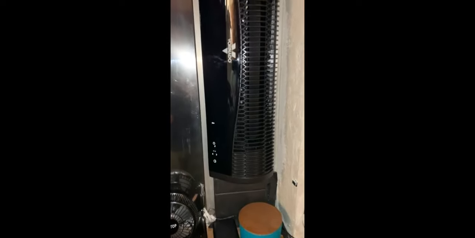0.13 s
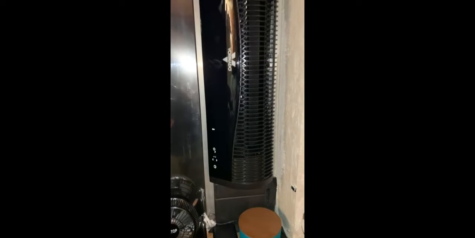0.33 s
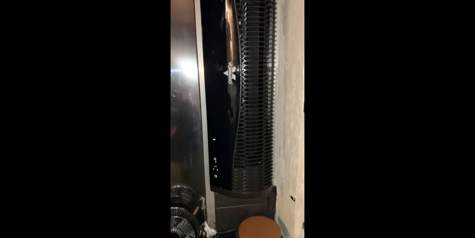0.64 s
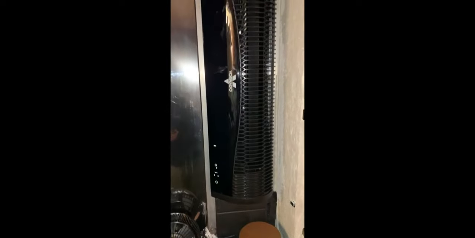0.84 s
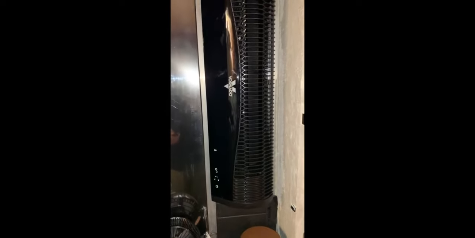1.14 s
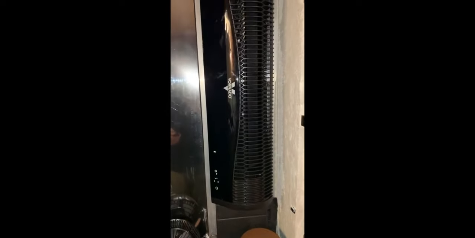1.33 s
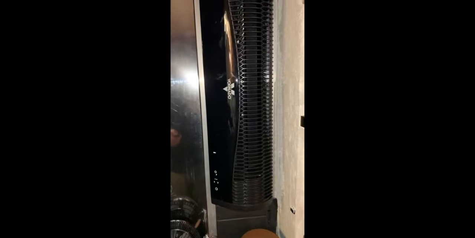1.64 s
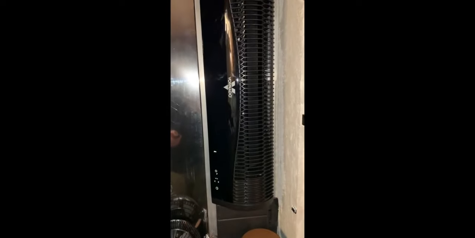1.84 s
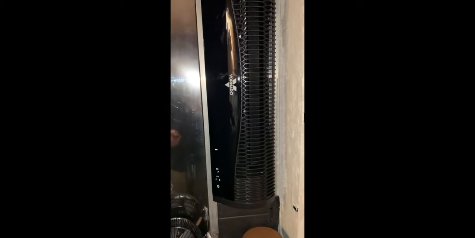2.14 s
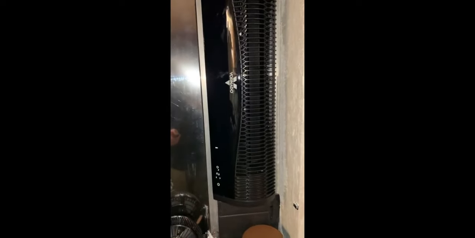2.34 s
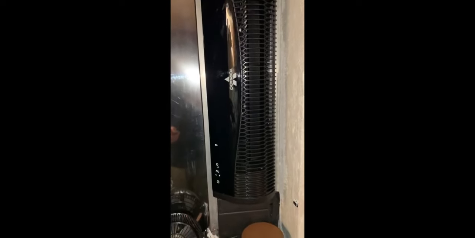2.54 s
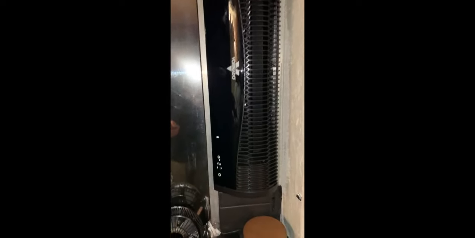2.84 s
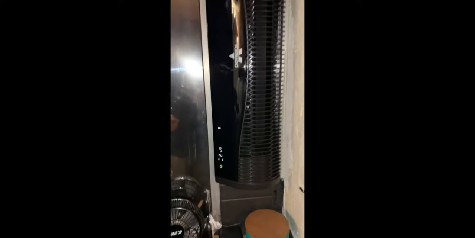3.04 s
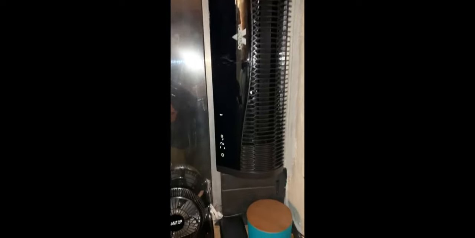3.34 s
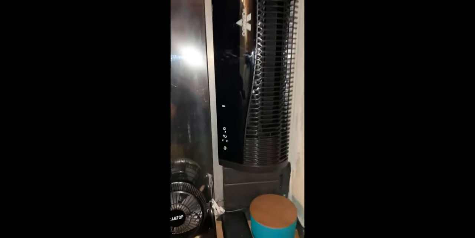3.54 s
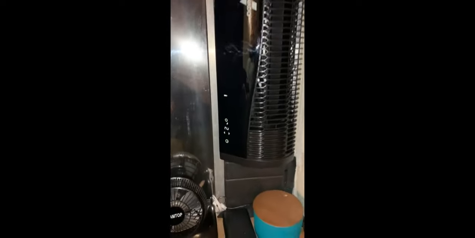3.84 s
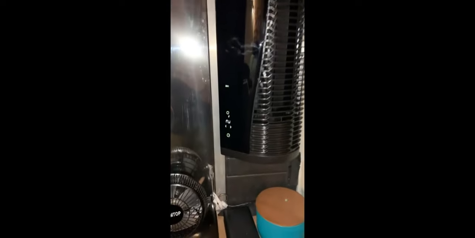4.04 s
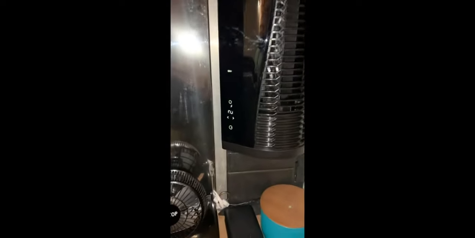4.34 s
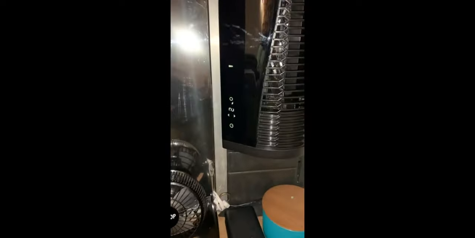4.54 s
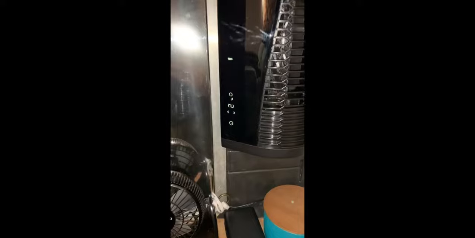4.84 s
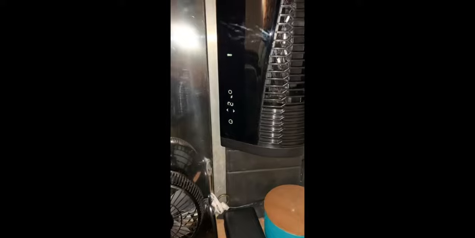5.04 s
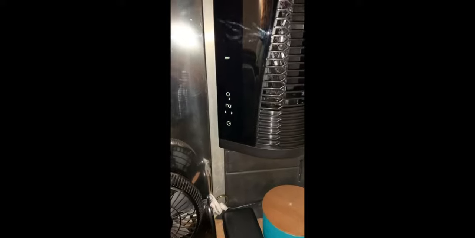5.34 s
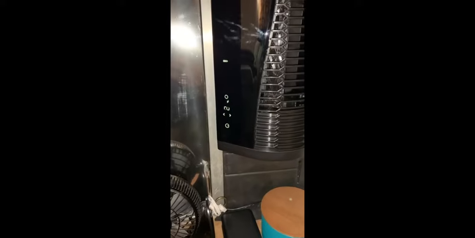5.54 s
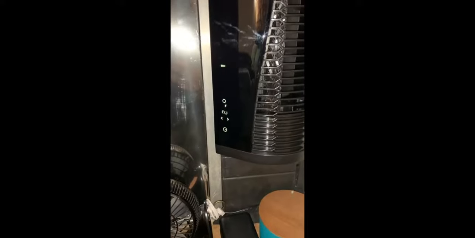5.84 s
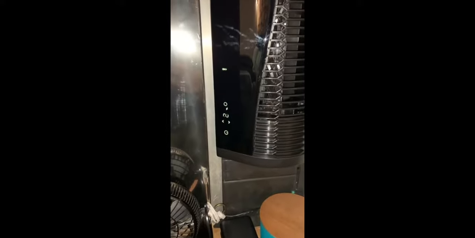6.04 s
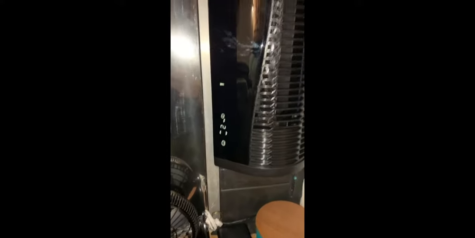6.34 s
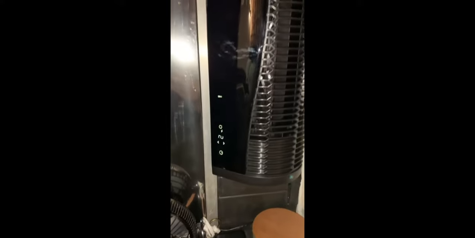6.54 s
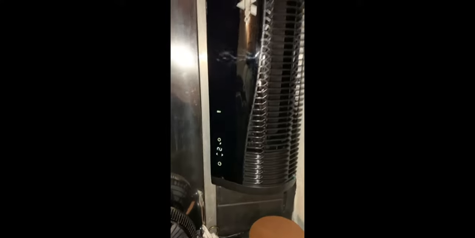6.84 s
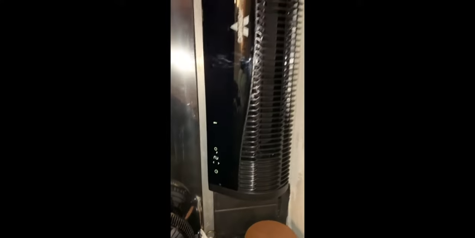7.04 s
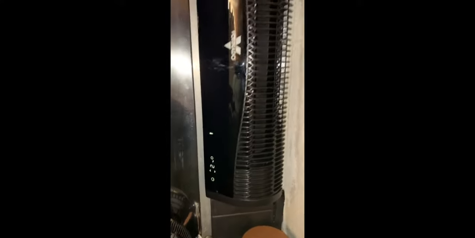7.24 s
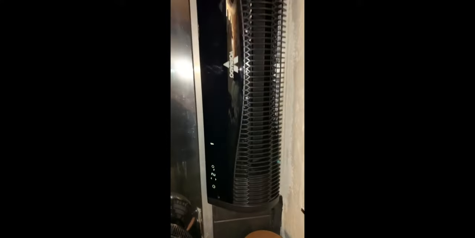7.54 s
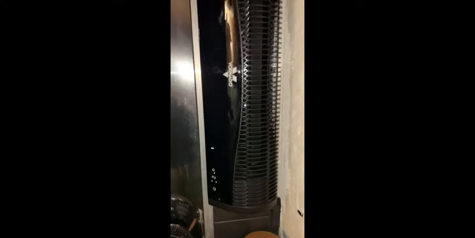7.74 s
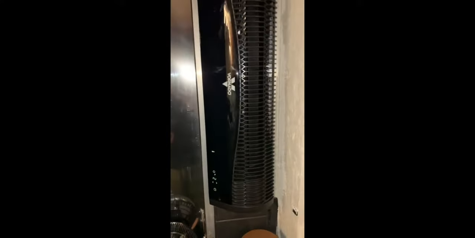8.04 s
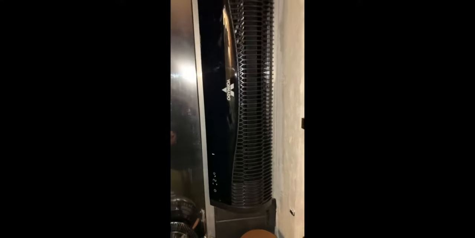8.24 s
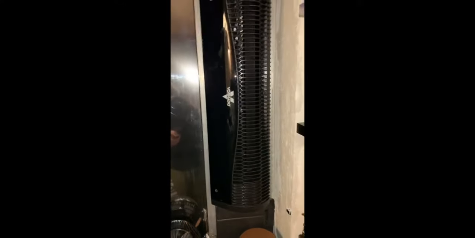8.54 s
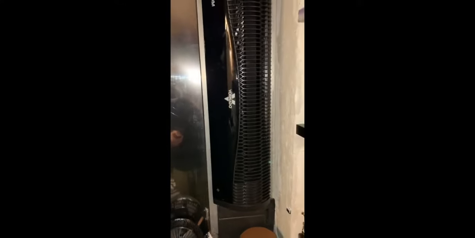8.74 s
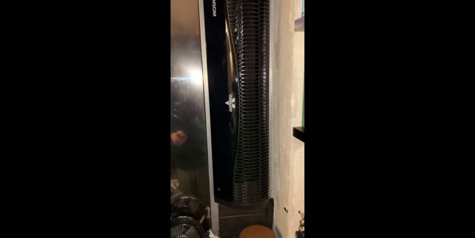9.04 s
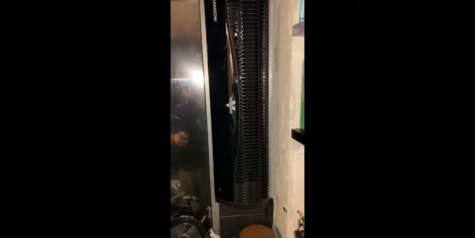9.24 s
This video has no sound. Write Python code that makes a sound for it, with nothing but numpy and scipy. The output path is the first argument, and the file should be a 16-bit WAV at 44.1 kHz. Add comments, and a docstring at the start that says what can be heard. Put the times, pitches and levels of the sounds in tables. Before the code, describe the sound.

In a small indoor room, a tower fan blows an even rush of air over a low rotor hum. Dull finger thumps come early, then the fan steps up and its hum rises slightly. The handheld microphone drifts into the stream, making it fuller and more whistling, then back out amid more thumps and a short low rumble.

```python
"""Tower fan and a hand-held phone

A tower fan runs in a small room and steps up to a faster setting; the phone moves into its air stream and out again.
Shaped noise forms the rush of air and a faint background hiss, and narrow resonances the whistle of the grille.
Sine tones form the hum of rotor and motor; three times the noise of air and rotor dips briefly.
Fingers and palm shift on the phone: decaying oscillations thump and low noise rumbles in its microphones."""
import sys
import numpy as np
from scipy import signal
from scipy.fft import rfft, irfft, next_fast_len
from scipy.io import wavfile
from scipy.ndimage import uniform_filter1d

SR = 44100
rng = np.random.default_rng(int(sys.argv[2]) if len(sys.argv) > 2 else 0)


def master(y):
    """Save y as 16-bit WAV."""
    cut = np.clip(np.atleast_2d(y).T, -1, 1)
    pcm = np.round(cut * 32767)  # scale
    wavfile.write(sys.argv[1], SR, pcm.astype(np.int16))


N = 414981

# Relative spectra of the air noise. Each row: frequency in Hz, density in dB per Hz.
DRAUGHT_COLOUR = [(15, -37.5), (30, -10.5), (48, 3), (80, 1.5), (140, -2.5), (210, -5.5), (300, -14.5),
                  (450, -10.5), (800, -21.5), (2000, -89)]
RUSH_COLOUR = [(100, -16.5), (300, -12), (450, -3), (600, -2.5), (760, -2), (920, -5.5), (1120, -7),
               (1270, -5.5), (1700, -8), (2050, -16.5), (2600, -15), (3100, -23.5), (3900, -24),
               (4700, -48), (9000, -72)]
HISS_COLOUR = [(1000, -15.5), (2200, -4), (2750, 7), (3300, 0), (4200, 1.5), (5100, -1), (5900, -5),
               (6600, -5.5), (7300, -5.5), (8600, -10.5), (9600, -43), (12500, -18.5), (14500, -31)]
# Relative spectrum of the faint background hiss. Each row: frequency in Hz, density in dB per Hz.
FLOOR_COLOUR = [(100, -3.5), (9500, -19.5), (11200, 14.5), (12600, 13), (14000, 11.5), (15000, -19.5)]
FLOOR_DB = -87.5
# Level laws. Each holds: dB at the slow setting, dB gained by the step in speed,
# dB gained in the stream, share of the dips as a factor.
DRAUGHT_LAW = (-49, 1.5, 2.5, 1.2)
RUSH_LAW = (-54, 2.5, 1.5, .5)
HISS_LAW = (-77, 5.5, 2, 1.5)
WHISTLE_LAW = (-60, 0.5, 6, 1.5)
# Depth of the slow random flutter, rms dB.
RUSH_FLUTTER_DB, HISS_FLUTTER_DB, WHISTLE_FLUTTER_DB = 0.4, 0.7, 1.1
# Standing waves in the tall housing. Each row: frequency in Hz, width in Hz, lift in dB.
HOUSING_MODES = [(615, 38, 5), (686, 24, 5.5), (811, 34, 3.5), (912, 44, 5), (1043, 32, 6), (1133, 19, 5.5),
                 (3630, 150, 1.5), (4540, 91, 3.5), (5270, 140, 5.5), (6380, 120, 5), (6710, 160, 4.5)]
# Resonances of the duct and grille. Each row: frequency in Hz, width in Hz, relative density in dB,
# beaming as a factor on the whistle's swing in level.
GRILLE_MODES = [(286, 99, -5, 3.8), (1449, 59, 5.5, 0.92), (1490, 50, -0.5, .2), (1565, 47, 3, 1.36),
                (1643, 40, -5, 1.3), (1806, 59, -10.5, 1.1), (2440, 31, -18, .1), (2630, 44, -9, 1.7),
                (2747, 32, -13.5, 1.8), (2815, 40, -17, 1.5), (2983, 61, -19, 3), (3280, 460, -21.5, 2.04)]
# Momentary swells of the whistles near one pitch. Each row: crest in seconds, half-length in seconds,
# pitch in Hz, lift in dB.
SWELLS = [(3.25, 0.2, 2700, 7.5), (3.61, 0.15, 2650, 8.5), (3.853, 0.48, 1510, 1), (5.63, 0.14, 2700, 4.5),
          (6.242, 0.17, 2650, 5), (7.16, 0.22, 1500, 4.5), (8.404, 0.56, 2680, 6)]
SWELL_REACH_HZ = 220
# Pitch drift of the air's resonances as stream and phone move. It holds: rms share of the pitch, drifts per second.
DRIFT = (.003, 1.5)
# Ripple on the air noise, fine all over and coarser in the treble. Each row: rms depth in dB before evening,
# patch width in Hz, patch length in seconds, frequency of full depth in Hz, width of even power in Hz.
RIPPLE = [(2.1, 15, .065, 600, 200), (1.7, 55, .035, 2600, 2500)]
# Left and right in the noise. Each row: frequency in Hz, likeness from 0 to 1.
LIKENESS = [(60, 1), (130, 1), (220, 0.8), (350, .95), (750, 0.6), (1030, .5), (1450, 1), (2100, 0),
            (2800, 0.73), (3600, 0.55), (5000, 0.9), (13000, .75)]
# Each row: frequency in Hz, phase by which left leads in radians.
NOISE_LEAD = [(35, -.14), (130, -.36), (280, -.3), (550, 0.55), (820, 0.7), (1050, -0.6), (1480, -0.85),
              (1950, -1.5), (2350, -3.5), (3900, -4.5), (4900, -3.5), (7000, 1.5), (9700, -1.5), (11000, 0),
              (14500, 0)]
# Each row: frequency in Hz, left minus right in dB.
BALANCE = [(40, -.2), (120, -2.5), (400, -2.8), (700, -2), (1300, 0), (2300, -2), (6000, 0.5)]
# Position in the air stream. Each row: time in seconds, nearness from 0 to 1.
NEARNESS = [(0, 0.2), (2.3, 0.02), (3.6, 0.28), (4.6, 0.9), (6.5, 0.97), (7.2, 0.7), (8.2, 0.27),
            (9.41, 0.05)]
# Brief dips in the noise of air and rotor. Each row: start in seconds, hold in seconds, release in seconds,
# depth in dB before each layer's share.
DIPS = [(0.52, 0.31, 0.38, 3), (1.856, 0.85, 0.13, 3.5), (7.647, 0.092, 0.53, 3)]
DIP_FALL_S = 0.016
# Rotor partials. Each row: multiple of the rotor tone, rms dB at the slow setting before each side's offset,
# dB gained by the step in speed, dB gained in the stream.
ROTOR_PARTIALS = [(1, -48.5, -1, 6), (2, -49, 2.5, 4), (4, -73.5, 3, 6.5)]
ROTOR_DIP_SHARE = 1.15
# The rotor tone is steady at first, then settles on a higher pitch and keeps creeping up.
SLOW_HZ, STEP_HZ, CREEP_HZ_PER_S = 83.9, 8.15, 0.44
SPEED_UP_S, SPIN_UP_S = 2.65, 0.58
# Mains hum of the motor. Each row: frequency in Hz, rms level in dB, dB gained in the stream.
MAINS_HUM = [(119.3, -55.5, 0), (479.1, -74.5, 8)]
# Finger knocks ahead of the case. Each row: crest in seconds, peak in dB, pitch at the crest in Hz,
# rise in cycles, fall in cycles, relative skin drag in dB.
THUMPS = [(0.3462, -22, 111, 0.78, 0.92, -6), (0.357, -25, 170, 0.67, 1.6, -6),
          (0.377, -15, 139.4, 1.7, 0.97, -21), (.388, -16.5, 113, 0.35, 1.9, -6),
          (0.441, -17, 84.5, 0.3, 1.5, -19), (0.4463, -26.5, 220, 0.45, 1.7, -18),
          (0.478, -33, 186, .9, 0.64, -12), (0.49, -21.5, 80, 1.1, 0.72, -22),
          (1.7268, -14, 92, 1.05, 0.85, -9.5), (1.7419, -28, 263, 0.53, 1, -11),
          (1.754, -21, 79, .8, 1.04, -4), (1.789, -31, 115, 1.4, 1.8, -25),
          (3.328, -20, 105, 0.85, 0.47, -1.5), (3.34, -14, 88.6, 0.74, 0.75, -12),
          (3.3704, -22.5, 136, 1.43, 1.7, -21), (3.603, -30.5, 85, 0.7, 1, -25),
          (7.131, -30, 75, 1.2, 1.6, -18), (7.171, -24, 134, .6, 0.95, -15),
          (7.193, -27.5, 84.5, 0.76, 1.4, -27), (7.236, -31.5, 84, 0.79, 2.4, -19),
          (7.3763, -10.5, 260, 0.55, 1.6, -22), (7.3843, -17, 472, 0.89, 2.3, -8),
          (7.3903, -14, 103, 0.46, .45, -12), (7.422, -22.5, 61.6, 1.4, .7, -18),
          (7.442, -23, 63, 0.6, 1, -24), (7.6391, -24, 252, 1.07, 1.1, 0), (7.647, -20, 85, 0.74, 1.1, -20),
          (7.6597, -18, 99, 1.04, 0.36, -12), (9.078, -30.5, 69.5, 0.62, 1.1, -16)]
# Shift of the palm. It holds: start in seconds, length in seconds, level in dB ahead of the case.
GRIP = (7.03, 0.685, -42.5)
# Case vibration at the two microphones. Each row: frequency in Hz, phase by which left leads in radians.
CASE_LEAD = [(35, -.24), (100, -.47), (250, -.63)]
EDGE_HZ = 14250


def amp(db):
    """Decibel law: a level becomes an amplitude ratio."""
    return 10 ** (np.asarray(db) / 20)


def evened(x):
    """Normalisation: the mean power becomes 1."""
    return x / np.sqrt(np.mean(x ** 2) + 1e-20)


def at_hz(points, hz):
    """Interpolation: a curve is read on a log-frequency axis."""
    f, value = np.transpose(points)
    return np.interp(np.log(hz + 1), np.log(f + 1), value)


def colour_gain(colour, hz):
    """Spectral shaping: a spectrum in dB becomes a gain."""
    return amp(at_hz(colour, hz))


def wander(rate_hz, size=4096):
    """Low-pass noise: a slow fluctuation of about rms 1, with little above the rate."""
    hz = np.fft.rfftfreq(size, N / SR / size)
    spectrum = rfft(rng.standard_normal(size)) / (1 + (hz / rate_hz) ** 2)
    slow = evened(irfft(spectrum))
    return np.interp(np.arange(N), np.linspace(0, N, size), slow)


def nearness():
    """Linear motion: the phone's place in the air stream is interpolated sample by sample."""
    return np.interp(np.arange(N) / SR, *np.transpose(NEARNESS))


def rotor_hz():
    """Inertia: the rotor eases exponentially from the slow setting to the fast one."""
    since = np.maximum(np.arange(N) / SR - SPEED_UP_S, 0)
    return SLOW_HZ + STEP_HZ * (1 - np.exp(-since / SPIN_UP_S)) + CREEP_HZ_PER_S * since


def dips_db():
    """Level envelope: each dip falls quickly, holds, and recovers more slowly."""
    t = np.arange(N) / SR
    total = np.zeros(N)
    for start, hold, release, depth_db in DIPS:
        corners = start + np.cumsum([0, DIP_FALL_S, hold, release])
        total -= depth_db * np.interp(t, corners, [0, 1, 1, 0])
    return total


def level(law):
    """Superposition in dB: a layer gains with rotor speed and nearness, and takes its share of the dips."""
    slow_db, step_db, stream_db, dip_share = law
    speed = (rotor_hz() - SLOW_HZ) / STEP_HZ
    return slow_db + step_db * speed + stream_db * nearness() + dip_share * dips_db()


def stereo_noise(gain_at):
    """Partial coherence: left and right carry noise that is alike by frequency; their mean has rms 1."""
    size = next_fast_len(N, True)
    hz = np.fft.rfftfreq(size, 1 / SR)
    left, other = rng.standard_normal((2, 2 * len(hz))).view(complex)
    same = np.clip(at_hz(LIKENESS, hz), 0, 0.985)
    right = same * left + np.sqrt(1 - same ** 2) * other
    right = right * np.exp(-1j * at_hz(NOISE_LEAD, hz)) / amp(at_hz(BALANCE, hz))
    pair = irfft(np.array([left, right]) * gain_at(hz), size)[:, :N]
    return pair / pair.mean(0).std()


def housing_gain(hz):
    """Standing waves: the housing's modes lift bands of the air noise."""
    return amp(sum(db * np.exp(-((hz - f) / width) ** 2) for f, width, db in HOUSING_MODES))


def drifting(pair):
    """Variable-speed reading: the pitch of a noise's resonances wanders slowly."""
    share, rate_hz = DRIFT
    speed = 1 + share * wander(rate_hz)
    place = np.cumsum(speed / speed.mean()) - 1
    return np.array([np.interp(place, np.arange(N), side) for side in pair])


def airflow(buffet_db=1.4):
    """Turbulence: draught, rush and hiss; the hiss grows most with speed, the draught with nearness."""
    draught = stereo_noise(lambda hz: colour_gain(DRAUGHT_COLOUR, hz))
    draught = draught * amp(level(DRAUGHT_LAW) + buffet_db * wander(rate_hz=18))
    rush = drifting(stereo_noise(lambda hz: colour_gain(RUSH_COLOUR, hz) * housing_gain(hz)))
    rush = rush * amp(level(RUSH_LAW) + RUSH_FLUTTER_DB * wander(rate_hz=10))
    hiss = stereo_noise(lambda hz: colour_gain(HISS_COLOUR, hz) * housing_gain(hz))
    hiss = hiss * amp(level(HISS_LAW) + HISS_FLUTTER_DB * wander(rate_hz=14))
    return draught + rush + hiss


def swells_db(hz):
    """Gaussian weighting: swells lift a resonance according to its distance in pitch and time."""
    t = np.arange(N) / SR
    total = np.zeros(N)
    for s, half, f, db in SWELLS:
        if abs(hz - f) < 2 * SWELL_REACH_HZ:
            total += db * np.exp(-((hz - f) / SWELL_REACH_HZ) ** 2 - ((t - s) / half) ** 2)
    return total


def whistle():
    """Resonance: eddies keep each mode ringing; those that beam fade most as the phone leaves the stream."""
    whistle_db = level(WHISTLE_LAW)
    swing_db = whistle_db - whistle_db.mean()
    power = sum(amp(db) ** 2 * width for f, width, db, beaming in GRILLE_MODES)
    pair = np.zeros((2, N))
    for f, width, db, beaming in GRILLE_MODES:
        ring = stereo_noise(lambda hz: 1 / (1 + ((hz - f) / width) ** 2)) * np.sqrt(width / power)
        flutter_db = WHISTLE_FLUTTER_DB * wander(rate_hz=16)
        pair += drifting(ring) * amp(db + beaming * swing_db + swells_db(f) + flutter_db)
    return pair * amp(whistle_db.mean())


def rippled(pair, size=2048):
    """Spectral modulation: peaks and notches shift, balanced within a band so that the rush stays even."""
    overlap = 3 * size // 4
    hz, t, z = signal.stft(pair, SR, nperseg=size, noverlap=overlap)
    for depth_db, width_hz, length_s, full_hz, even_hz in RIPPLE:
        across_hz = signal.windows.gaussian(21, width_hz / hz[1])
        along_time = signal.windows.gaussian(41, length_s / t[1])
        chance = rng.standard_normal(z.shape[1:])
        field = evened(signal.fftconvolve(chance, np.outer(across_hz, along_time), "same"))
        gain = amp(depth_db * np.minimum(hz / full_hz, 1)[:, None] * field)
        z = z * gain / np.sqrt(uniform_filter1d(gain ** 2, round(even_hz / hz[1]), axis=0))
    return signal.istft(z, SR, nperseg=size, noverlap=overlap)[1][:, :N]


def rotor(wobble=0.00063, waver_db=1.1, left_db=-3.5, right_db=-1.0, right_lead=0.36, shade_db=1.0):
    """Harmonic locking: tones follow the rotor, uneven inflow wavers them; up close the left side is shaded."""
    turns = np.cumsum(rotor_hz() * (1 + wobble * wander(rate_hz=2.9))) / SR
    side_lead = np.array([[0], [right_lead]])  # radians
    tone = np.zeros((2, N))
    for multiple, *law in ROTOR_PARTIALS:
        loudness = amp(level((*law, ROTOR_DIP_SHARE)) + waver_db * wander(rate_hz=2.9))
        tone += loudness * np.sin(2 * np.pi * (multiple * turns + rng.random()) + side_lead)
    return np.sqrt(2) * tone * amp([left_db - shade_db * nearness(), np.full(N, right_db)])


def motor(waver_db=3.0):
    """Magnetic hum: the windings sound fixed tones; the higher leaves by the outlet and grows in the stream."""
    t = np.arange(N) / SR
    hum = np.zeros(N)
    for hz, db, stream_db in MAINS_HUM:
        loudness = amp(db + stream_db * nearness() + waver_db * wander(rate_hz=1))
        hum += loudness * np.sin(2 * np.pi * (hz * t + rng.random()))
    return np.sqrt(2) * hum


def background_hiss():
    """Steady noise: a faint high hiss under everything."""
    return amp(FLOOR_DB) * stereo_noise(lambda hz: colour_gain(FLOOR_COLOUR, hz))


def handling(spread=0.5, rub_hz=400):
    """Dispersion: in the phone's case a bump's lows arrive last, so its period stretches as it dies."""
    bumps, slip = np.zeros((2, N))
    for s, db, hz, rise, fall, drag_db in THUMPS:
        first = max(round(s * SR) - SR // 20, 0)
        at = np.arange(first, min(round(s * SR) + SR // 2, N))
        stretch = np.maximum(1 + spread * hz * (at / SR - s), 1e-6)
        turns = np.log(stretch) / spread
        swell = amp(db) * np.exp(-(turns / np.where(turns < 0, rise, fall)) ** 2)
        bumps[at] += swell * np.cos(2 * np.pi * turns)
        slip[at] += amp(drag_db) * swell * hz / rub_hz / np.maximum(stretch, 1)
    # the skin drags on the case, more under quicker bumps
    band = signal.butter(3, [rub_hz / 2, rub_hz * 0.9], "band", fs=SR, output="sos")
    rub = signal.sosfilt(band, rng.standard_normal(N))
    return bumps + slip * evened(rub)


def grip(low_hz=35, high_hz=130, lumpy_db=0.5, fade_s=0.031):
    """Friction: the palm creeps over the case with a low, lumpy rumble."""
    start, length, db = GRIP
    t = np.arange(N) / SR - start
    held = np.clip(np.minimum(t, length - t) / fade_s, 0, 1)
    band = signal.butter(2, [low_hz, high_hz], "band", fs=SR, output="sos")
    rumble = signal.sosfilt(band, rng.standard_normal(N))
    return held * amp(db + lumpy_db * wander(rate_hz=13)) * evened(rumble)


def through_case(x, low_hz=37):
    """Structure-borne sound: vibration reaches the microphones out of step, without its deepest bass."""
    size = next_fast_len(N, True)
    hz = np.fft.rfftfreq(size, 1 / SR)
    spectrum = rfft(x, size) * hz ** 3 / np.sqrt(hz ** 6 + low_hz ** 6)
    half_lead = 0.5 * at_hz(CASE_LEAD, hz) * np.array([[1], [-1]])
    return irfft(spectrum * np.exp(1j * half_lead), size)[:, :N]


def scene():
    """Superposition: the fan, the background hiss and the hand on the phone add up."""
    air = rippled(airflow() + whistle())
    fan = air + rotor() + motor()
    hand = through_case(handling() + grip())
    return fan + background_hiss() + hand


def record(dry):
    """Band limitation: a linear-phase low-pass removes what lies above the recorder's edge."""
    lowpass = signal.firwin(511, EDGE_HZ, window=("kaiser", 9), fs=SR)
    return signal.oaconvolve(dry, lowpass[None], "same")


dry = scene()
out = record(dry)
master(out)
```